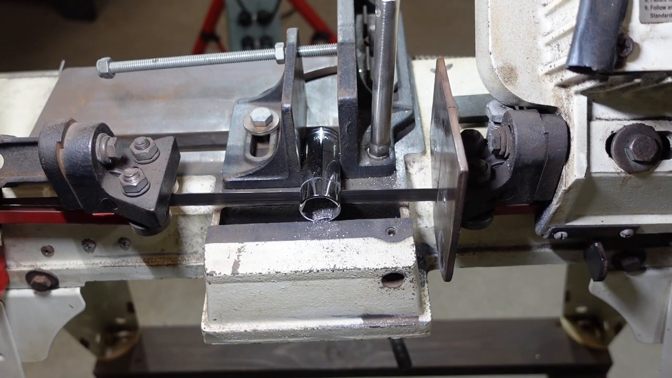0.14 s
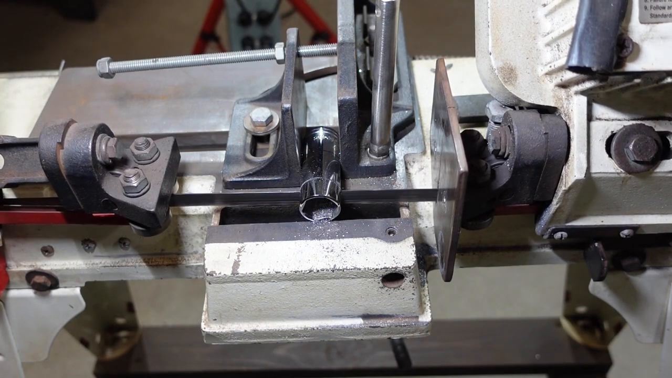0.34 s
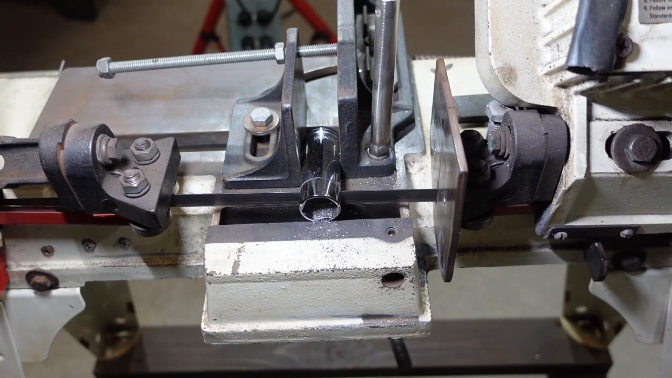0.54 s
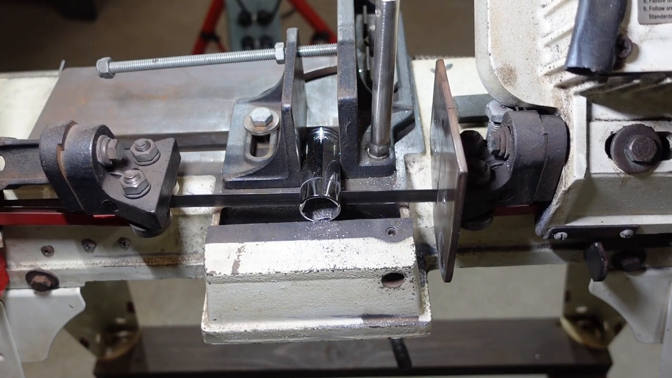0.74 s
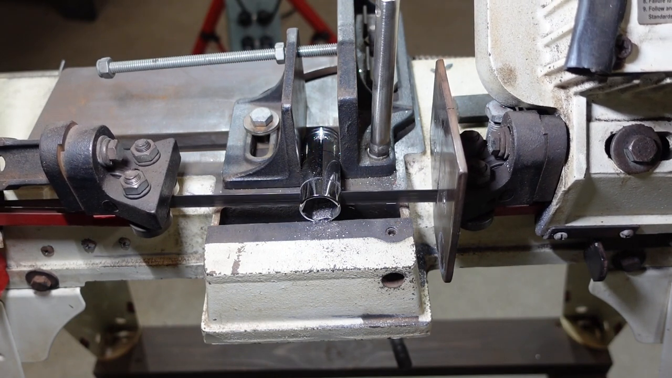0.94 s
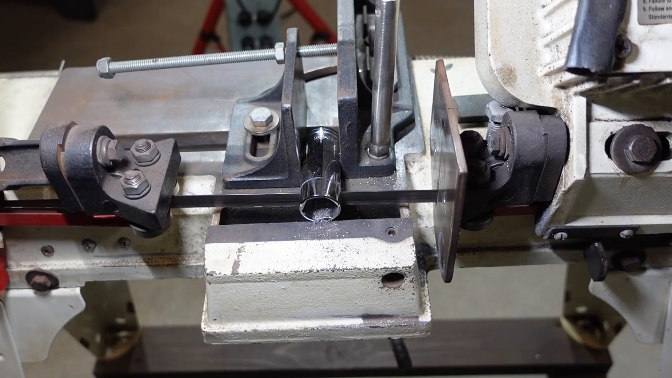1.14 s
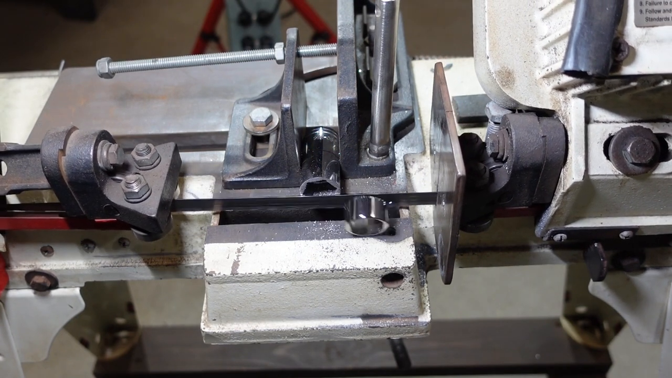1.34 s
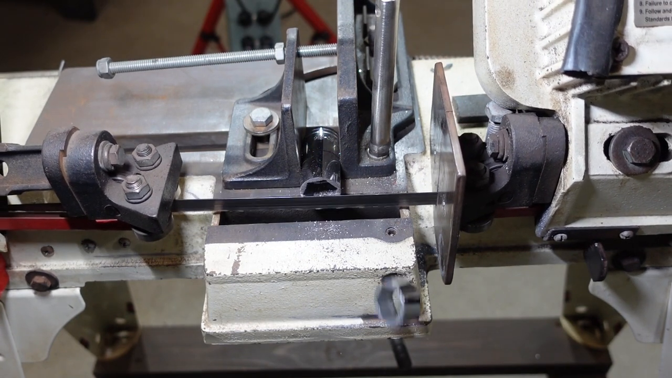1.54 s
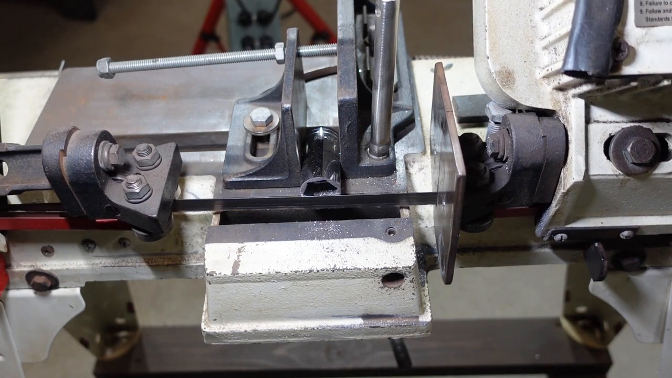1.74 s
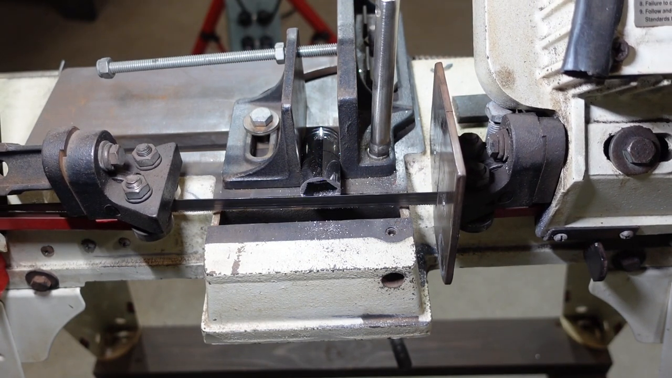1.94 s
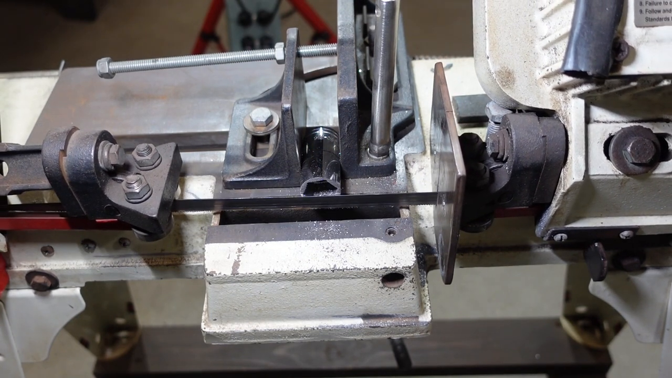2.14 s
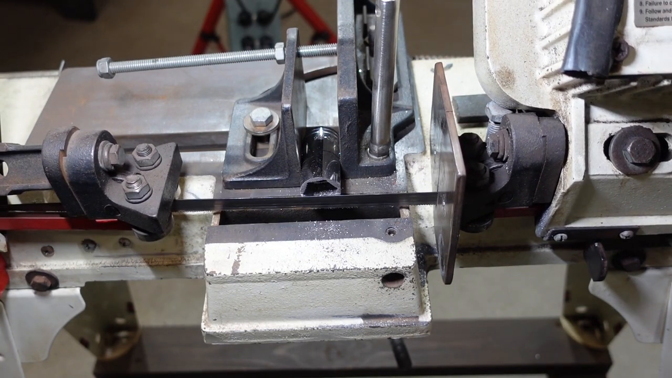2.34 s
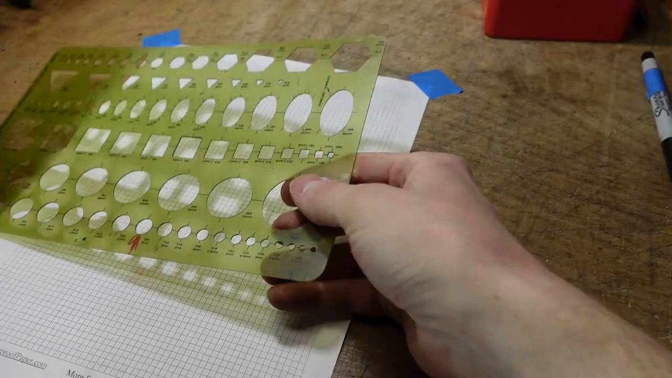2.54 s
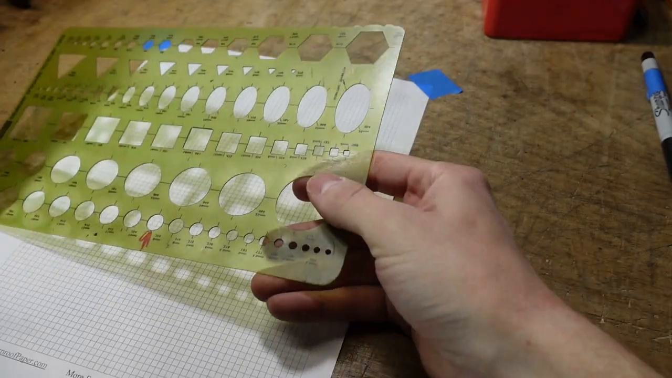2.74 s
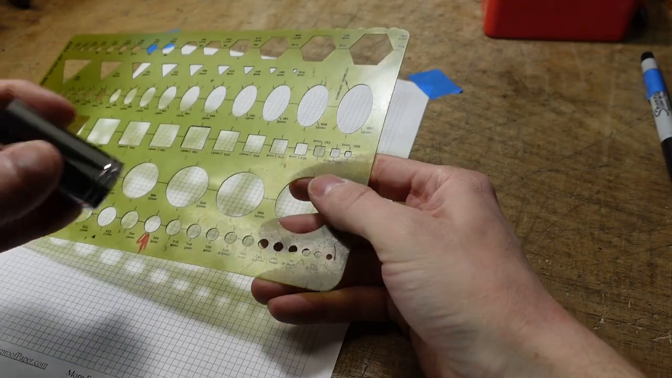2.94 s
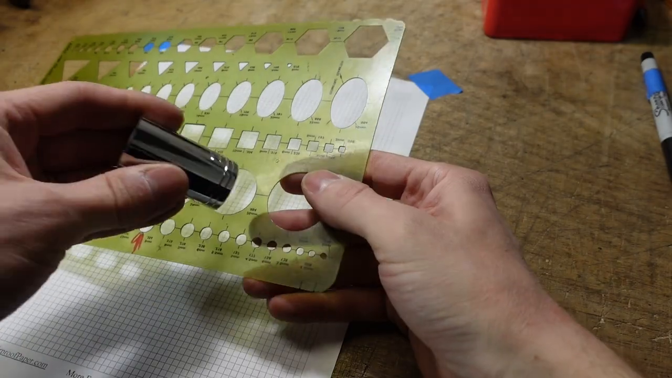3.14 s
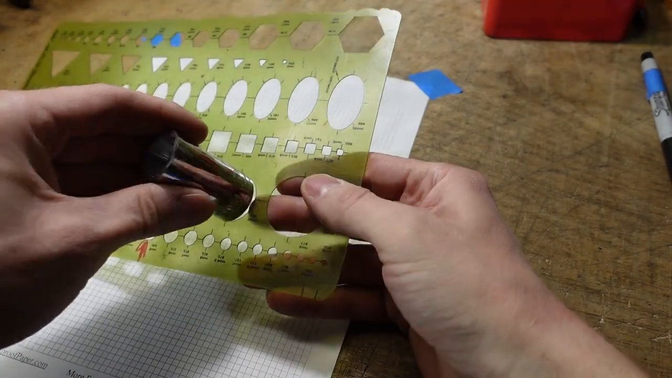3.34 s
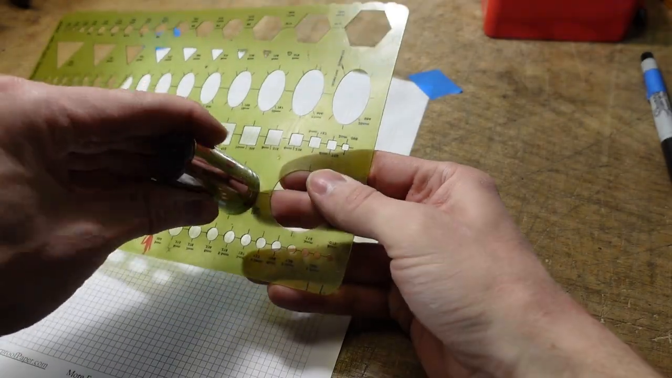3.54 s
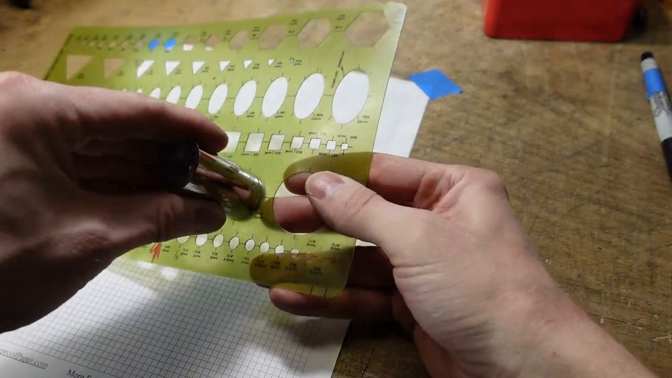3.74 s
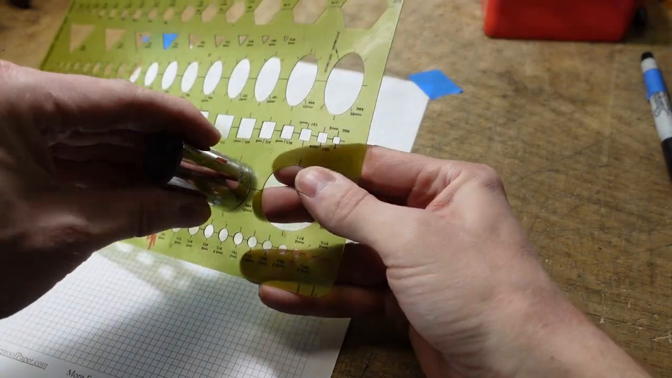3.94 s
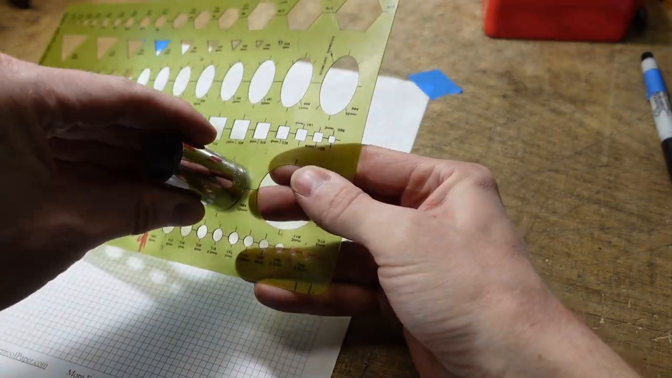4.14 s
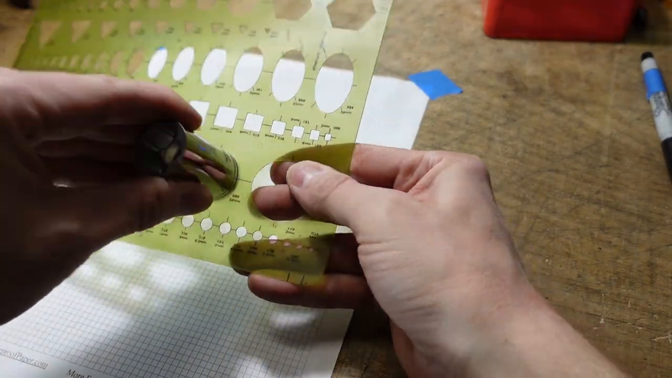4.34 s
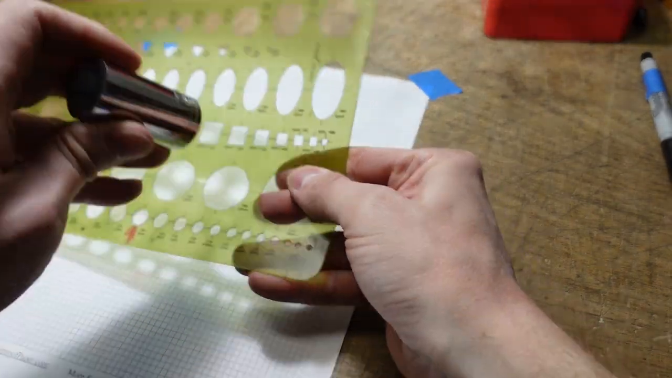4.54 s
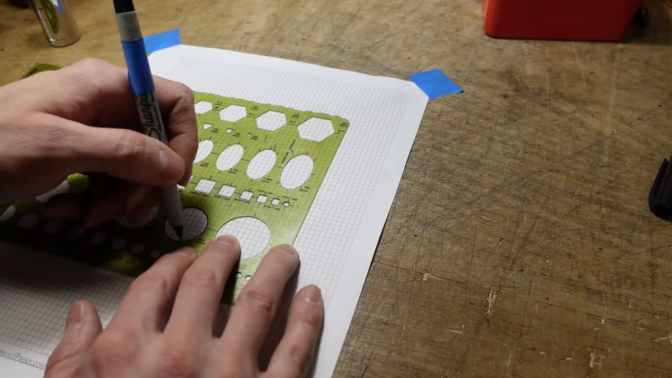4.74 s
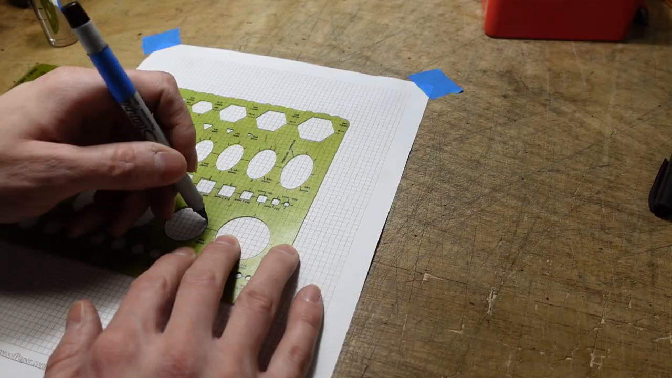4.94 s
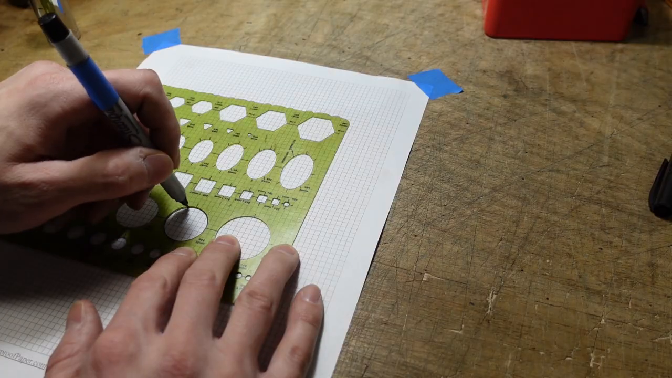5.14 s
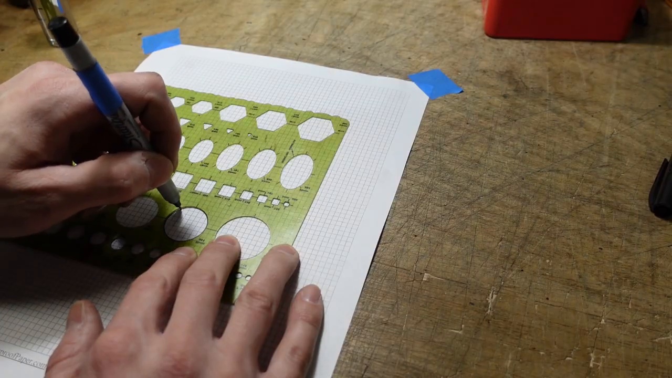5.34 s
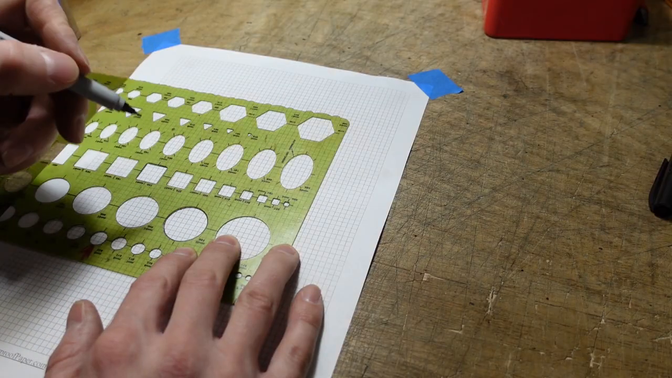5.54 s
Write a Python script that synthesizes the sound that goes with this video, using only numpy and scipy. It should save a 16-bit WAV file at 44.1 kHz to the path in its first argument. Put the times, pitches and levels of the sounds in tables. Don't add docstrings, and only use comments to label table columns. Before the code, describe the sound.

From 0 to 0.9 s, sped-up metal sawing is a dense, bright, harsh hiss with resonant whine, thin hum and passing squeaks. It cuts to true speed: a fuller, lower motor rumble with rasping teeth, gritty chips, blade singing and short squeals. At about 1.33 s the blade breaks through with a loud crack; the saw runs free, shudders, and coasts down from 1.5 to 2.2 s. The steel offcut clanks hard around 1.6 s, scrapes over the bed, hits the floor at 1.97 s and tumbles with a very high, fluttering ring, bouncing again at 2.37 s. At 2.47 s everything abruptly becomes a quiet bench with faint room air. A plastic stencil wobbles and clicks at 2.55 s, rustles lightly, gets a sharp tap at 3.66 s, a faint one at 4.27 s and a firm slap at 4.57 s. From 4.69 s a pen scratches paper softly in short strokes, fading into near silence.

```python
import sys
import numpy as np
from scipy import signal
from scipy.fft import rfft, irfft
from scipy.io import wavfile
from scipy.ndimage import uniform_filter1d, minimum_filter1d

SR = 44100
rng = np.random.default_rng(int(sys.argv[2]) if len(sys.argv) > 2 else 0)


def wav_out(sig):
    wavfile.write(sys.argv[1], SR, np.round(np.clip(np.atleast_2d(sig).T, -1, 1) * 32767).astype(np.int16))


def voltage_ratio(level):
    return 10 ** (np.asarray(level, float) / 20)


N = 246078
T = np.arange(N) / SR

CUTS = [
    0,
    .8995,
    2.4675,
    4.672,
]

# [f/Hz, level/dB per Hz]
FAST_BODY = [(88, -92), (150, -52.5), (438, -25.5), (474, -20.5), (532, -41), (587, -14), (817, -10.5),
             (937, -10), (1250, -5), (1440, -0.5), (3140, -8), (3520, -2.5), (7110, -4.5), (10300, -0.5),
             (15800, -8)]
# [f/Hz, width/Hz, level/dB]
FAST_RINGS = [(930, 23, -4), (1423, 24, -22), (1860, 240, -7.5), (2520, 28, -17.5), (2880, 68, -6.5),
              (3550, 43, 1), (3860, 42, -12), (3957, 28, -5), (4350, 90, -4), (4800, 31, -21),
              (5313, 37, -4), (5660, 72, -1), (6035, 88, -1.5), (6670, 83, -3), (7567, 150, -6.5),
              (8300, 56, -24), (8900, 290, -1.5), (9500, 300, -10), (10360, 410, -4.5), (12420, 220, -22),
              (13320, 71, -1), (13900, 52, -6), (15180, 500, -3)]
# [multiple of HUM_HZ, level/dB]
HUM = [(1, -49), (1.253, -47.5), (1.992, -41.5), (3, -42.5), (4, -39), (5, -45.5), (7.3, -40.5),
       (8.95, -37), (10, -46)]
# [t/s, length/s, level/dB, f/Hz, slide/Hz per s]
SQUEAKS = [(.29, 0.093, -24, 4850, -900), (.76, 0.05, -24.5, 5680, 0), (0.16, .03, -25, 5240, 0),
           (0.33, 0.036, -26, 3520, 0), (.69, 0.083, -25, 3510, -4), (.81, 0.046, -26.5, 1780, 1),
           (0.61, .05, -38, 1900, 0), (0.034, 0.086, -32, 3530, -3), (0.46, .12, -44, 8900, 0),
           (.58, .04, -33, 15000, 0), (0.75, 0.045, -34, 6400, 0), (1, .03, -31, 18000, 0)]
FAST_DB, FAST_RINGS_DB = -15.5, 4.5
HUM_HZ, HUM_BLUR = 482, 1.4
# [t/s, level/dB, lowest f/Hz, highest f/Hz]
PUFFS = [(.0346, -28, 4150, 5400), (.0346, -20, 8300, 11300), (1.2653, -26, 4700, 6500),
         (1.2653, -29, 7600, 9200), (1.2653, -36, 11000, 12600)]

# [f/Hz, level/dB per Hz]
SAW_BODY = [(53, -57.5), (90, -27), (109, -14.5), (188, -16.5), (229, -5.5), (430, 0.5), (664, -5.5),
            (862, -4), (1250, -5.5), (2240, -3), (2910, -4.5), (6360, -11.5), (7570, -17.5), (12000, -22),
            (16200, -37.5)]
# [f/Hz, width/Hz, level/dB]
SAW_RINGS = [(436, 140, -2), (910, 60, 0), (1056, 44, -6), (1413, 29, 2), (1880, 37, -11), (2170, 170, -5),
             (2520, 200, -1), (3960, 120, -9), (3980, 29, -4.5), (5240, 120, -9.5), (6130, 120, -7.5),
             (6670, 80, -8.5), (7295, 85, -11.5), (9070, 160, -18.5), (10360, 430, -14.5),
             (11700, 110, -15.5), (13330, 130, -21)]
# [f/Hz, width/Hz, level/dB]
MOTOR = [(123.3, 7, -24), (239.2, 5.6, -12.5), (267.9, 10, -19.5), (382, 10, -13.5), (439, 17, -11.5),
         (476.4, 10, -12), (520, 10, -15), (1085, 18, -8)]
# [t/s, level/dB]
DRIVE = [
    (0.9, 0),
    (1.33, 0),
    (1.45, 2),
    (1.526, -3),
    (1.565, -4),
    (1.64, -6.5),
    (1.8, -14.5),
    (1.96, -20.5),
    (2.2, -48.5),
]
# [level at full drive/dB,
# change once through/dB, share of the drive]
LAYERS = [
    (-23.5, 1.5, 1.06),
    (-17, -2.5, 1.4),
    (-30.5, -7.5, 1.3),
]
# [t/s, peak level/dB]
CHIPS = [(0.9677, -6.5), (0.9921, -18), (1.0271, -15), (1.05, -9), (1.1273, -13), (1.1473, -15.5),
         (1.1862, -8), (1.2266, -11.5), (1.3334, -12)]
SAW_RINGS_DB, HISS_LIFT_DB, SAW_PATCHY_DB = -1, 10.5, 1.2
THROUGH_S = 1.334
SLACK_DB, SLACK_S = -7, .05
TONES_FADE_DB_PER_S = 25

# [t/s, length/s, level/dB]
SING = [(0.87, 0.14, -35), (1.14, 0.15, -23.5), (1.36, 0.021, -33), (1.48, 0.09, -31.5),
        (1.64, 0.1036, -41), (1.79, 0.036, -46)]
SING_HZ, SING_EDGE_S = 882, 0.049
# [t/s, length/s, level/dB, f/Hz, slide/Hz per s]
SQUEALS = [(.915, 0.042, -21, 2320, -1200), (.95, 0.018, -25, 1890, 2.5), (1.015, 0.042, -24.5, 2600, 2),
           (1.13, .025, -24, 2520, 0), (1.24, .015, -22, 2250, 0), (1.05, .06, -25, 1880, 299.5),
           (1.06, 0.054, -24, 2276, -900), (1.09, .05, -26.5, 2440, 2599.5),
           (1.18, 0.053, -22.5, 2290, 299.5), (1.235, .03, -32, 2540, -1), (1.27, 0.022, -25.5, 1920, -0.5),
           (1.29, 0.032, -25, 2265, 5.5), (1.39, 0.033, -30.5, 2120, 3), (1.41, 0.023, -27.5, 2600, -3000),
           (1.35, 0.089, -27, 3850, 0.5)]
# [t/s, length/s, level/dB, f/Hz, slide/Hz per s]
SHUDDERS = [(1.3, 0.027, -24, 280, -1200), (1.44, 0.03, -24, 490, 0.5), (1.452, .008, -19.5, 1500, 4),
            (1.45, .01, -26.5, 1300, -3000), (1.478, 0.029, -19.5, 280, -1500),
            (1.52, 0.048, -27.5, 300, 1500), (1.4, .02, -33, 1500, 2.5), (1.88, 0.032, -48, 420, -4)]

# [f/Hz, level/dB per Hz]
AIR = [(35, -53.5), (70, -26.5), (180, -7.5), (530, -19), (1120, -23), (1350, -26), (2860, -22.5),
       (3530, -29.5), (15100, -38.5), (16200, -46.5)]
# [f/Hz, width/Hz, level/dB]
AIR_RINGS = [(178, 24, -41), (1130, 79, 3.5), (2180, 100, -11.5), (2619, 160, -22)]
# [f/Hz, width/Hz, level/dB]
BENCH_HUM = [(174, 8, -70), (236, 8, -76), (1140, 23, -78.5)]
# [f/Hz, level/dB per Hz]
AIR_LATE = [(24, -72), (40, -45), (118, -23), (151, -15), (185, -21), (250, -5), (446, -14), (481, -12.5),
            (815, -20.5), (1490, -20.5), (2120, -24), (3870, -23), (16200, -42.5)]
# [f/Hz, width/Hz, level/dB]
LATE_HUM = [(244, 8.3, -69.5), (160, 11.4, -74.5), (390, 13.6, -78)]
AIR_DB, LATE_DB = -61, -61

# [f/Hz, width/Hz, rise/ms, time to fall 60 dB/s, name]
RINGS = [(2415, 45, 1.5, .3, "oval"), (9250, 90, 9, .3, "wall"), (10150, 170, 8, .2, "rim"),
         (13100, 400, 5, .3, "lip"), (4870, 40, 2.5, .045, "clink"), (4650, 350, 8, .16, "bed"),
         (4430, 250, 2.5, .05, "clank"), (9300, 900, 2, .28, "halo"), (7200, 900, 5, .45, "vice"),
         (3300, 25, 20, .6, "guide"), (300, 170, 40, .45, "stand"), (2445, 70, 30, 4, "cover"),
         (700, 45, 22, .09, "stencil"), (8800, 500, 2, .12, "edge"), (5800, 400, 2, .1, "flap"),
         (800, 260, 4, .3, "bench"), (390, 450, 2.1, .2, "top"), (3600, 600, 3, .25, "sheet"),
         (494, 25, 40, .95, "wheel")]
# [t/s, level/dB, name]
STRIKES = [(1.27, -43, "lip"), (1.333, -13, "oval"), (1.352, -18, "wall"), (1.405, -24, "stand"),
           (1.42, -29, "rim"), (1.45, -20.5, "stand"), (1.48, -25, "rim"), (1.531, -30.5, "stand"),
           (1.553, -22.5, "wall"), (1.566, -25, "rim"), (1.5955, -17, "clink"), (1.6015, -7.5, "clink"),
           (1.97, -30, "halo"), (2.371, -28, "halo"), (2.41, -35, "halo"), (2.2, -64.5, "cover"),
           (1.613, -23.5, "clink"), (1.597, -18.5, "clank"), (1.78, -48.5, "guide"), (1.88, -50, "guide"),
           (1.656, -25, "clink"), (1.724, -32, "bed"), (1.95, -38.5, "bed"), (1.375, -24, "oval"),
           (4.576, -48, "flap"), (1.608, -28.5, "vice"), (1.62, -29, "bed"), (1.62, -38.5, "lip"),
           (1.75, -51, "guide"), (1.619, -52, "cover"), (1.66, -37, "wheel"), (1.701, -31, "bed"),
           (1.808, -36.5, "bed"), (2.2, -66, "cover"), (2.121, -67, "cover"), (1.45, -30, "wall"),
           (1.62, -34, "wall"), (1.665, -42, "wall"), (1.72, -45.5, "wall"), (3.668, -57.5, "sheet"),
           (3.668, -59.5, "edge"), (1.82, -50.5, "guide"), (4.535, -50.5, "stencil"),
           (3.42, -53, "stencil"), (4.572, -48.5, "top"), (4.574, -40, "edge"), (4.575, -50, "bench"),
           (4.612, -45, "edge")]
# [f/Hz, time to fall 60 dB/s]
SHOP = [(200, 0.38), (1000, 0.75), (4000, 0.39), (9000, 0.486), (11500, 0.38), (16000, 0.3)]
# [t/s, peak
# level/dB, brightest f/Hz, treble level/dB]
BLOWS = [(1.334, 0, 5980, -6.5), (1.388, -3, 2232, -10.5), (1.554, -12, 3200, -11.5),
         (1.595, -8, 4800, 1.5), (1.6021, -6.5, 4900, -7), (1.735, -33, 4630, -9.5),
         (1.816, -32.5, 4620, -11), (1.845, -37.5, 8990, -3), (1.92, -29, 6180, -10),
         (2.005, -27.5, 3199, -8), (2.084, -38.5, 4500, -6.5), (2.117, -40, 3516, -8),
         (2.132, -46, 10000, -6), (2.392, -31, 3200, -7), (2.415, -35.5, 4500, -5)]
BLOW_MS, BLOW_ROOM_DB = 4.1, -3.5
# [t/s, depth/dB, recovery/s]
DUCKS = [
    (1.339, -10, .03),
    (1.607, -7, .03),
]
# [t/s, length/s, level/dB]
SLIDES = [(1.62, 0.078, -34), (1.725, 0.018, -43), (1.812, 0.029, -41), (1.838, 0.025, -40),
          (1.87, 0.022, -42), (1.92, .008, -46)]
# [f/Hz, level/dB per Hz]
SLIDE = [(2500, -28.5), (4500, 1), (6500, -5), (8800, 0), (9700, -9.5), (11000, -17.5), (16000, -31.5)]

# [t/s, level/dB, echo in the dip before it/dB]
LOBES = [(1.966, -10.5, -31), (1.977, -8.5, -31), (1.987, -11, -30.5), (2.0024, -8.5, -24), (2.02, -5, -15),
         (2.0337, -10, -15), (2.0433, -14, -13), (2.0548, 0, -20), (2.0695, -12, -28), (2.078, -7, -9),
         (2.108, -9, -19), (2.1217, -8.5, -25), (2.15, -31, -22), (2.159, -22, -21.5), (2.1776, -18, -42),
         (2.193, -17.5, -25), (2.2086, -16.5, -34), (2.232, -11, -25), (2.26, -27, -23),
         (2.272, -16, -42.5), (2.2864, -15, -18.5), (2.306, -18, -20), (2.318, -31, -41.5),
         (2.323, -15.5, -47.5), (2.343, -19, -21), (2.352, -18, -38), (2.365, -18.5, -49),
         (2.3795, -12, -43), (2.403, -12, -28), (2.42, -19, -29), (2.4287, -19, -26), (2.44, -11.5, -19),
         (2.479, -7, -13)]
# [t/s, peak level/dB, f/Hz, room level/dB]
BOUNCES = [
    (1.9693, -1.5, 3994, 0),
    (2.3701, -11.5, 3820, 9.5),
]
WALL_HZ, SINK_HZ, SINK_S = 9280, 44.4, 0.16
LEAN = .85
FLOOR_TOP_HZ = 12500

# [t/s, peak level/dB, brightest f/Hz, treble level/dB, burst/ms]
TAPS = [(2.5445, -51, 9000, -12.5, 1.2), (2.548, -17, 9500, 1, 2.8), (3.273, -49.5, 4020, -11, 1.5),
        (3.3215, -41, 6200, 1.5, 1.2), (3.35, -48.5, 6510, -21, 1.27), (3.458, -60, 4500, -17.5, 1.4),
        (3.627, -55, 9230, -19.5, 5), (3.6647, -15, 3540, -10.5, 0.71), (3.668, -29, 1700, -14, 1.55),
        (4.271, -35.5, 4330, -3.5, 1.95), (4.5725, -10.5, 2160, -1, 1.25), (4.6096, -21, 8500, -3, 3.1),
        (4.639, -33.5, 8560, -4.5, 1.5), (4.728, -43.5, 1750, -12, 4.5), (4.8595, -43, 12700, -3, 2.2)]
# [f/Hz, width/Hz, level/dB]
PLATE = [(3730, 1600, -6), (5900, 690, -8), (9000, 1600, -0.5), (10500, 800, -5)]
TAP_ROOM_DB, TAP_TAIL = -17.5, .6
# [t/s, length/s, level/dB, centre f/Hz, width/Hz]
RUSTLE = [(2.431, 0.19, -55, 6850, 9000), (2.563, 0.22, -62.5, 10900, 8900), (2.702, .08, -58, 12920, 8030),
          (2.905, 0.066, -74.5, 9920, 5020), (3.222, 0.053, -68.5, 9850, 3000),
          (3.288, 0.13, -70.5, 9010, 7050), (3.932, 0.13, -60.5, 2960, 4010),
          (3.94, .11, -64.5, 10500, 3980), (4.161, 0.063, -68, 4600, 2000),
          (4.388, 0.045, -69.5, 6010, 6000), (4.556, 0.031, -54, 8000, 9000),
          (4.61, 0.045, -63.5, 6940, 10000)]
# [t/s, length/s, level/dB]
WOBBLES = [(2.462, 0.014, -47), (2.486, 0.0058, -43), (2.496, 0.013, -46), (2.529, 0.011, -49),
           (2.54, 0.01, -43), (2.553, 0.013, -54)]
WOBBLE_HZ = 686
SPLICE_DB, SPLICE_S = -34.5, 0.00046

# [t/s, length/s, pressure level/dB, tip over barrel/dB]
PEN = [(4.687, 0.071, -53, -9.5), (4.765, 0.075, -56, -22), (4.85, 0.0087, -51.5, -7),
       (4.876, 0.17, -70, -6), (5.088, 0.036, -72.5, 5), (5.146, 0.05, -76, 10)]
# [f/Hz, width/Hz, level/dB]
BARREL = [(1880, 650, 2), (1620, 260, -4)]
# [f/Hz, width/Hz, level/dB]
TIP = [(5400, 1400, 0), (8700, 3300, -5), (12700, 1200, 8), (14500, 3200, -10)]
PEN_RISE_S, PEN_FALL_S = 0.011, 0.028
DRAG_DB, DRAG_FADE_DB_PER_S = -65, 27

LIMIT, EDGE_HZ = .72, 15900
MASK_DB, MASK_DB_PER_KHZ, MASK_FROM_HZ = 63.5, .4, 10000


def evened(x):
    return x / np.sqrt(np.mean(x ** 2) + 1e-20)


def read(points, hz):
    f, value = np.transpose(points)
    return np.interp(np.log(hz + 1), np.log(f + 1), value)


def add(mix, s, sound):
    part = mix[round(s * SR):][:len(sound)]
    part += sound[:len(part)]


def shape(points):
    return lambda hz: voltage_ratio(read(points, hz))


def modes(rows):
    return lambda hz: sum(voltage_ratio(db) / (1 + ((hz - f) / w * 2) ** 2) for f, w, db in rows)


def band(x, lo_hz, hi_hz):
    return signal.sosfilt(signal.butter(N=3, Wn=[lo_hz, hi_hz], btype="band", fs=SR, output="sos"), x)


def noise(gain, patchy_db=1.5, flicker_db=1.0, streak_db=2.5):
    frames, hz = N // 256 + 5, np.fft.rfftfreq(1024, 1 / SR)
    a, b, patches, streaks = rng.standard_normal((frames, 513, 4)).T
    patches = uniform_filter1d(patches, size=10, axis=0)
    patches = evened(uniform_filter1d(patches, size=10, axis=1))
    streaks = uniform_filter1d(streaks, size=3, axis=0)
    streaks = evened(uniform_filter1d(streaks, size=28, axis=1))
    flicker = rng.standard_normal(frames)
    field = voltage_ratio(patchy_db * patches + streak_db * streaks + flicker_db * flicker)
    spectra = (a + 1j * b) * gain(hz)[:, None] * field
    return signal.istft(spectra, nperseg=1024, noverlap=768)[1][:N]


def fuzzy(hz, width, count, steady=0.63):
    r, hz = np.exp(-np.pi * width / SR), np.resize(hz, count)
    drift = rng.standard_normal(count + 4000) + 1j * rng.standard_normal(count + 4000)
    drift = signal.lfilter([1], [1, -2 * r, r * r], drift)[4000:]
    drift = steady + drift / np.sqrt(np.mean(abs(drift) ** 2))
    return evened((drift * np.exp(2j * np.pi * np.cumsum(hz) / SR)).real)


def strokes(rows, rise_s, fall_s):
    return sum(voltage_ratio(db) * np.clip(np.minimum((T - s) / rise_s, 1 + (s + length - T) / fall_s), 0, 1) ** 2
               for s, length, db in rows)


def chirps(rows, edge_s, width, steady):
    out = np.zeros(N)
    for s, length, db, hz, slide in rows:
        t = np.arange(-edge_s, length + edge_s, 1 / SR)
        edge = np.clip(np.minimum(t + edge_s, length + edge_s - t) / edge_s, 0, 1) ** 2
        tone = fuzzy(hz + slide * t, width, count=12000, steady=steady)[:len(t)]
        add(out, s - edge_s, voltage_ratio(db) * edge * tone)
    return out


def room(x):
    hz, t, z = signal.stft(rng.standard_normal(SR // 2), SR, nperseg=128)
    fading = z * voltage_ratio(-60 * t / read(SHOP, hz)[:, None])
    tail = signal.istft(fading, SR, nperseg=128)[1]
    tail[:40] = 0
    return signal.oaconvolve(x, tail / np.linalg.norm(tail))[:N]


def fast_cut():
    body, resonances = shape(FAST_BODY), modes(FAST_RINGS)

    def colour(hz):
        return body(hz) * (1 + resonances(hz) * voltage_ratio(FAST_RINGS_DB)) + voltage_ratio(-40.5)

    rasp = evened(noise(colour, 0.93, 0.7, 1.5))
    hum = sum(voltage_ratio(db + 3.0) * fuzzy(k * HUM_HZ, HUM_BLUR * k, N, 1.1) for k, db in HUM)
    squeaks = voltage_ratio(-2.5) * chirps(SQUEAKS, 0.028, 100, .3)
    return voltage_ratio(FAST_DB) * rasp + hum + squeaks


def puffs():
    out, hz = np.zeros(N), np.fft.rfftfreq(2048, 1 / SR)
    for s, db, lo_hz, hi_hz in PUFFS:
        grit = irfft(rfft(rng.standard_normal(2048)) * (hz > lo_hz) * (hz < hi_hz))
        add(out, s, voltage_ratio(db) * evened(grit) * np.hanning(2048))
    return out * np.array([[1], [-1]])


def blade():
    sing = strokes(SING, SING_EDGE_S, SING_EDGE_S) * fuzzy(SING_HZ, 11, N, 3.6)
    squeals = voltage_ratio(-0.5) * chirps(SQUEALS, .012, 280, .12)
    shudders = voltage_ratio(-2.5) * chirps(SHUDDERS, .015, 66, 0.55)
    return sing + squeals + shudders


def saw():
    drive = np.interp(T, *np.transpose(DRIVE))
    through = T > THROUGH_S
    low, mid, high = (voltage_ratio(db + eased_db * through + share * drive) for db, eased_db, share in LAYERS)
    body, resonances = shape(SAW_BODY), modes(SAW_RINGS)

    def colour(hz):
        return np.sqrt(body(hz) ** 2 + (resonances(hz) * voltage_ratio(SAW_RINGS_DB)) ** 2)

    teeth = noise(colour, SAW_PATCHY_DB, 0.99, 1.2)
    rumble, rasp, hiss = band(teeth, 100, 900), band(teeth, 900, 5500), band(teeth, 5500, 18000)
    tones = sum(voltage_ratio(db) * fuzzy(hz, width, N, .9) for hz, width, db in MOTOR)
    tones = tones * voltage_ratio(-TONES_FADE_DB_PER_S * np.maximum(T - THROUGH_S, 0))
    slack = voltage_ratio(SLACK_DB * np.exp(-abs(T - THROUGH_S) / SLACK_S) * through)
    tear = np.ones(N)
    for s, db in CHIPS:
        add(tear, s, voltage_ratio(db + 9.0) * np.exp(-np.arange(600) / SR / 0.0054))
    out = low * slack * evened(evened(rumble) + tones) + mid * evened(rasp)
    return out + voltage_ratio(HISS_LIFT_DB) * high * evened(hiss) * tear


def air(points, db, tones):
    body, resonances = shape(points), modes(AIR_RINGS)
    wash = voltage_ratio(db) * evened(noise(lambda hz: body(hz) * (1 + .5 * resonances(hz)), 0.99, .5))
    return wash + sum(voltage_ratio(hum_db) * fuzzy(hz, width, N) for hz, width, hum_db in tones)


def rings():
    out, mode = np.zeros(N), {row[-1]: row[:-1] for row in RINGS}
    for s, db, name in STRIKES:
        hz, width, rise_ms, t60 = mode[name]
        until_cut = [round((cut - s) * SR) for cut in CUTS if cut > s]
        t = T[:min([SR // 2] + until_cut)]
        tone = fuzzy(hz, width, len(t), min(0.21 + 0.36 * t60, 1))
        add(out, s, tone * voltage_ratio(db - 60 * t / t60) * np.minimum(t * 1000 / rise_ms, 1))
    return out


def knocks(rows, room_db, floor_db, tail, tick, plate=()):
    dry, send, t = np.zeros(N), np.zeros(N), np.arange(2048) / SR
    f = np.fft.rfftfreq(2048, 1 / SR)
    for (s, db, hz, treble_db, ms), grit in zip(rows, rng.standard_normal((len(rows), 2048))):
        grit = grit * (np.exp(-(t * 1000 / ms) ** 2) + tail * np.exp(-t * 1000 / (3.0 * ms)))
        grit[0] += tick
        bright = 1 / (1 + 1.8j * (f / hz - hz / (f + 1)))
        colour = bright + voltage_ratio(floor_db) * 1j * f / (700 + 1j * f)
        colour = colour * (1 + sum(voltage_ratio(lift_db) / (1 + 2j * (f - peak) / width)
                                   for peak, width, lift_db in plate))
        shelf = (12000 + voltage_ratio(treble_db) * 1j * f) / (12000 + 1j * f)
        colour = colour * shelf ** 4
        blow = irfft(rfft(grit) * colour)[:1900]
        blow *= voltage_ratio(db) / abs(blow).max()
        add(dry, s, blow)
        even = irfft(colour)[:1900]
        add(send, s, voltage_ratio(room_db) * even * np.linalg.norm(blow) / np.linalg.norm(even))
    return dry + room(send)


def duck():
    return voltage_ratio(sum(db * np.exp(-abs(T - s) / back) * (T > s) for s, db, back in DUCKS))


def slides():
    return strokes(SLIDES, 0.0074, 0.022) * evened(noise(shape(SLIDE), 1.99, 1.51, 2.5))


def tumble():
    s, db, echo_db = np.transpose(LOBES)
    lobe = np.interp(T, s, np.arange(len(s)))
    angle = np.pi * (lobe // 1 + (lobe % 1) ** LEAN)
    size = np.interp(T, (s[1:] + s[:-1]) / 2, voltage_ratio(db[:-1]))
    direct = uniform_filter1d(uniform_filter1d(size * np.sin(angle), size=90), size=90)
    echo = uniform_filter1d(np.interp(T, s, voltage_ratio(echo_db)) * np.cos(angle) ** 2, size=120)
    since = np.minimum(*(np.where(T < row[0], np.inf, T - row[0]) for row in BOUNCES))
    pitch = WALL_HZ - SINK_HZ * np.minimum(since / SINK_S, 1)
    turn = 2 * np.pi * np.cumsum(pitch) / SR
    struck = np.clip((T - BOUNCES[0][0]) / 0.00079, 0, 1)
    return np.sqrt(2) * struck * (direct * np.sin(turn) + echo * np.cos(turn))


def bounces():
    dry, send, t = np.zeros(N), np.zeros(N), T[:64]
    for s, db, hz, room_db in BOUNCES:
        hit = np.tanh(1.8 * np.sin(2 * np.pi * hz * t)) * np.exp(-(t * hz / 1.65) ** 6)
        tick = np.cos(2 * np.pi * hz * t) * np.exp(-(t * hz / 0.54) ** 2)
        add(dry, s, voltage_ratio(db) * hit)
        add(send, s, voltage_ratio(db + room_db) * tick)
    return band(dry, 250, 18000) + room(band(send, 500, FLOOR_TOP_HZ))


def rustle():
    out, hz_axis = np.zeros(N), np.fft.rfftfreq(8192, 1 / SR)
    for s, length, db, hz, width in RUSTLE:
        grains = np.repeat(rng.standard_normal(64), repeats=128)
        grit = rng.standard_normal(8192) * voltage_ratio(1.4 * grains)
        swish = evened(irfft(rfft(grit) * modes([(hz, width, 0)])(hz_axis)))
        count = min(round(length * SR), 8192)
        add(out, s, voltage_ratio(db) * swish[:count] * np.hanning(count))
    return out


def wobbles():
    return strokes(WOBBLES, 0.0033, 0.021) * fuzzy(WOBBLE_HZ, 30, N, 1.0)


def pen():
    drag = voltage_ratio(DRAG_DB - DRAG_FADE_DB_PER_S * (T - PEN[0][0])) * (T > PEN[0][0])
    barrel_rows = [row[:3] for row in PEN]
    tip_rows = [(s, length, db + tip_db) for s, length, db, tip_db in PEN]
    barrel = drag + strokes(barrel_rows, PEN_RISE_S, PEN_FALL_S)
    tip = voltage_ratio(-0.5) * drag + strokes(tip_rows, PEN_RISE_S, PEN_FALL_S)
    return barrel * evened(noise(modes(BARREL), 2.1, 2.9)) + tip * evened(noise(modes(TIP), 2.0, 3.2))


def scene():
    shot, still = np.searchsorted(CUTS, T, "right"), air(AIR, AIR_DB, BENCH_HUM)
    blows = knocks([(*row, BLOW_MS) for row in BLOWS], BLOW_ROOM_DB, -12.0, 0.37, 1.6)
    shop = saw() * duck() + blade() + blows + slides() + bounces() + tumble()
    shop = shop + voltage_ratio(4.5) * band(still, 60, 6500)
    stencil_taps = knocks(TAPS[:-2], TAP_ROOM_DB, 1.2, TAP_TAIL, 4.1, PLATE)
    stencil = still + stencil_taps + rustle() + wobbles()
    pen_taps = knocks(TAPS[-2:], TAP_ROOM_DB, -6, .3, 1.5)
    drawing = air(AIR_LATE, LATE_DB, LATE_HUM) + pen_taps + pen()
    mix = np.select([shot == 1, shot == 2, shot == 3], [fast_cut(), shop, stencil], drawing) + rings()
    step = voltage_ratio(SPLICE_DB) * np.exp(-((T - CUTS[2]) / SPLICE_S) ** 2)
    return mix - step + puffs()


def masked(x):
    padded = np.pad(x, ((0, 0), (521, 0)))
    hz, _, z = signal.stft(padded, SR, "cosine", nperseg=2048, noverlap=1024)
    power = (abs(z) ** 2).mean(0)
    bands = power[:1024].reshape(32, 32, -1).mean(1)
    bands = np.repeat(bands, repeats=32, axis=0)
    treble = hz[:1024, None] > MASK_FROM_HZ
    reach = voltage_ratio(2 * (MASK_DB_PER_KHZ * (hz[:1024, None] - MASK_FROM_HZ) / 1000 - MASK_DB))
    loudest = power[hz > MASK_FROM_HZ / 2].max(0)
    faint = (bands < reach * loudest) & treble
    keep = np.pad(~faint, ((0, 1), (0, 0)))
    return signal.istft(z * keep, SR, "cosine", nperseg=2048, noverlap=1024)[1][:, 521:521 + N]


def top_cut(x):
    return signal.sosfilt(signal.butter(12, 17100, fs=SR, output="sos"), x)


def record(dry):
    limiter = np.minimum(LIMIT / (abs(dry).max(0) + 1e-9), 1)
    x = dry * uniform_filter1d(minimum_filter1d(limiter, size=61), size=31)
    x = signal.sosfilt(signal.butter(N=2, Wn=80, btype="high", fs=SR, output="sos"), x)
    edge = signal.firwin(numtaps=401, cutoff=EDGE_HZ, window=("kaiser", 6), fs=SR)
    mix = signal.oaconvolve(masked(x), edge[None], "same")
    return top_cut(mix)


dry = scene()
out = record(dry)
wav_out(out)
```